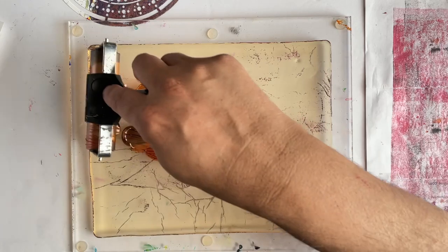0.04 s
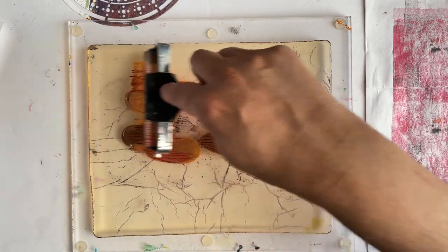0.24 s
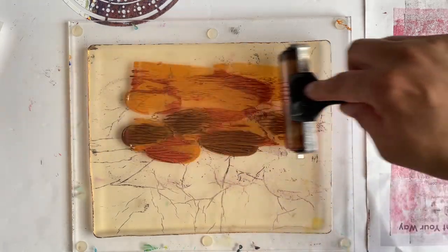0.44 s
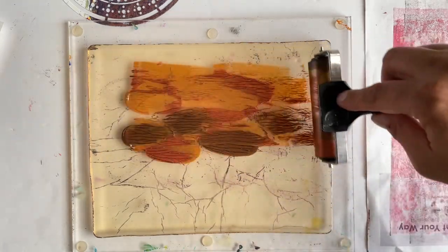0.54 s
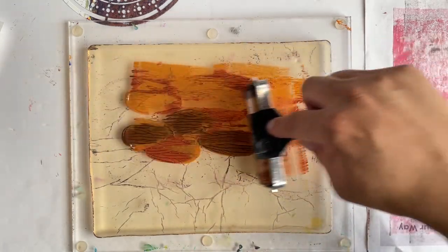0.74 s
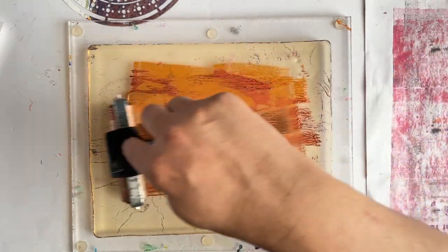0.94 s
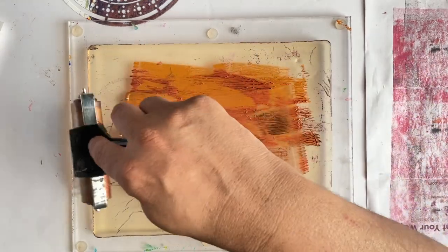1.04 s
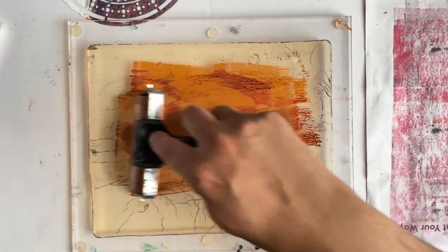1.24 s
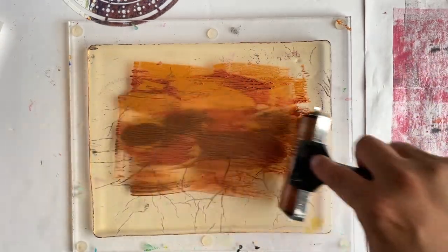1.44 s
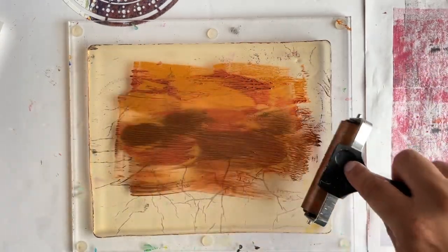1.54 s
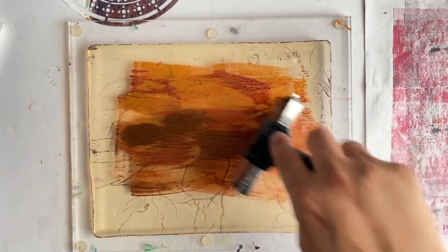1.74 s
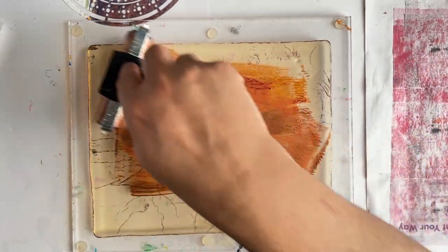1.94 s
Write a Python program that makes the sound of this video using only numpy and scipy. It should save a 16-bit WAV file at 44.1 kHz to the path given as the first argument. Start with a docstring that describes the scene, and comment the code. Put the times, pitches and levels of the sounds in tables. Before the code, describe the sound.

A hand roller is pushed quickly back and forth through tacky paint, its loose axle rattling in sharp metallic clack bursts at each turn, with soft sticky hiss between, close stereo microphone in a small quiet room.

```python
"""A faint low hum and a soft hiss come first, then the quick metallic chatter of a hand roller on a soft plate.
At each turn the loose axle knocks in its metal frame (ticks ringing tuned parts) and the table thuds (low tones
that die away). Between turns the roller hisses through tacky paint (coloured noise with crackle), with dull
scuffs (puffs of low noise). Rumble and hum lie underneath; left and right differ in phase, opposite near
9 to 11 kHz."""
import sys
import numpy as np
from scipy import signal
from scipy.fft import rfft, irfft
from scipy.io import wavfile
from scipy.ndimage import uniform_filter1d

SR = 44100
rng = np.random.default_rng(int(sys.argv[2]) if len(sys.argv) > 2 else 0)


def unload_audio(sound):
    """Save the sound as a 16-bit wav file, at the path given as the first command line argument."""
    columns = np.transpose(np.atleast_2d(sound))
    # keep every value between -1 and 1, then stretch to whole-number steps
    steps = np.round(np.clip(columns, -1, 1) * 32767)
    wavfile.write(sys.argv[1], SR, steps.astype(np.int16))


N = 88200  # samples: two seconds


def gain_of(db):
    """Turn decibels into an amplitude factor."""
    return 10 ** (np.asarray(db) / 20)


def evened(x):
    """Scale a sound to an average (RMS) level of 1."""
    return x / np.sqrt(np.mean(x ** 2) + 1e-20)


def read_at_pitch(points, hz):
    """Read a table between its points, along a logarithmic pitch scale."""
    point_hz, value = np.transpose(points)
    return np.interp(np.log(hz + 1), np.log(point_hz + 1), value)


def curve(points):
    """Draw straight lines through points in time, one value per sample."""
    seconds, value = np.transpose(points)
    return np.interp(np.arange(N) / SR, seconds, value)


def add(mix, start_s, sound):
    """Lay a sound into the mix, cutting off what runs past the end."""
    part = mix[..., round(start_s * SR):][..., :sound.shape[-1]]
    part += sound[..., :part.shape[-1]]


def through(x, taps):
    """Pass a sound through a filter and keep the scene's length."""
    return signal.oaconvolve(x, taps)[:N]


def colour(points, size=2048):
    """Build a filter with the given spectrum and energy 1 that responds only after its input."""
    hz = abs(np.fft.fftfreq(size, 1 / SR))
    log_gain = np.log(gain_of(read_at_pitch(points, hz)))
    phase = -signal.hilbert(log_gain).imag  # minimum phase puts the energy early
    taps = np.fft.ifft(np.exp(log_gain + 1j * phase)).real
    return taps / np.linalg.norm(taps)


def equalized(x, points):
    """Raise or lower each pitch of a sound by the decibels in a table."""
    hz = np.fft.rfftfreq(N, 1 / SR)
    return irfft(rfft(x) * gain_of(read_at_pitch(points, hz)), N)


def ring(modes):
    """Struck parts ring as a sum of fading sine tones, here with total energy 1."""
    t = np.arange(SR // 8) / SR
    taps = sum(gain_of(db - 60 * t / t60) * np.sin(2 * np.pi * hz * t) for hz, db, t60 in modes)
    return taps / np.linalg.norm(taps)


def ticks(shape, per_s, spread_db):
    """Random clicks, dense or sparse by their rate, of random sign and size."""
    size = gain_of(spread_db * np.minimum(rng.exponential(1, shape), 4))
    sign = rng.choice([-1., 1.], shape)
    happens = rng.random(shape) < per_s / SR
    return evened(size * sign * happens)


def turning_weight(k, turns_per_s):
    """One of three slow waves, a third of a turn apart, whose total power stays constant."""
    return np.sqrt(2 / 3) * np.cos(2 * np.pi * (turns_per_s * np.arange(N) / SR + k / 3))


# Knocks of the loose axle. Each row: start in seconds, relative level in dB, chatter fade time in seconds,
# body pitch in Hz, then extra level in dB for body, frame, bracket and axle.
AXLE_KNOCKS = [(0.1721, -52, 0.0027, 1490, -1, 6, 8.5, -2), (0.1806, -31, 0.0097, 1506, 17.5, -3.5, 16, 0),
               (0.1809, -33, 0.0033, 1200, -13, -30, -15, 14),
               (0.1896, -8.5, 0.0012, 1166, 13.5, -19, 15, 11.5),
               (0.1926, -6, 0.0019, 1270, -29, -18, -31, 2), (0.2024, -39, 0.0024, 1120, 18, -20, -22, -5),
               (0.317, -35.5, 0.0019, 1550, 10, -5, 11.5, -10),
               (0.4098, -45, 0.0043, 850, -7, -15, 10.5, 9), (0.4689, -26.5, 0.0031, 810, 1, -5, -1, -15),
               (0.4755, -9.5, 0.0036, 830, 5, -2, 8, 14), (0.4824, -17.5, 0.0027, 1105, 12, -10, 12.5, -20),
               (0.484, -2.5, 0.0023, 1520, -2.5, -13, -23, 10), (0.4896, -20, 0.0038, 1060, 4, -10, 1, -3),
               (0.4997, -27.5, 0.0033, 1640, -3, -4, 12, 13), (0.5133, -33, 0.0024, 1430, -2, -35, -7, 13),
               (0.555, -37, 0.0017, 1040, 16, 0, 19.5, -14), (0.6822, -43.5, 0.0038, 797, -14, -12, 24, -6),
               (0.687, -27, 0.0055, 950, 6.5, -11.5, -20, 0.5),
               (0.691, -10.5, 0.0048, 680, -3, -32, -27, -4),
               (0.6928, -11.5, 0.0025, 1600, -14.5, -4.5, 14.5, 3),
               (0.6952, -10.5, 0.0012, 2210, 2.5, -3, -27, 23.5),
               (0.9573, -43.5, 0.003, 1190, 14, -0.5, -1, -5),
               (0.9618, -30.5, 0.0033, 1310, 5.5, -6, 15, -21.5),
               (0.975, -16, 0.0011, 1460, 9.5, -9, 6, 15),
               (0.9773, -18, 0.003, 1096, -1, -18.5, -25.5, -21.5),
               (1.1716, -37, 0.0047, 1450, -1, -21, 18.5, -2.5),
               (1.1754, -25, 0.0032, 1510, 0.5, -9, -15, -5.5),
               (1.18, -5.5, 0.0061, 1760, 3, -21, -15.5, 8.5),
               (1.1823, -13, 0.0029, 1390, 10.5, -30, 16, 20.5),
               (1.1872, -7, 0.0018, 665, 0.5, -30, -21.5, 20),
               (1.1915, -36, 0.0025, 1600, -10, -25, -19, 5.5),
               (1.1993, -19, 0.0023, 1220, 5, -11, 8.5, -13), (1.436, -26, 0.0031, 1030, -5, -1, 4, 6),
               (1.457, -39, 0.0023, 755, 15, 2, 19, -2), (1.4642, -17, 0.0025, 790, 13, -1, 17.5, 20),
               (1.4702, -5, 0.004, 770, -5.5, -12.5, -38, 9.5),
               (1.4744, -17, 0.002, 1520, 12.5, -15, 15, 9), (1.4792, -17, 0.0031, 1155, 8, -46, -19, -2),
               (1.484, -45, 0.0015, 751, -7, -24, 20, -8), (1.5807, -41, 0.0025, 1150, 9.5, -7, 17.5, -23),
               (1.612, -47.5, 0.0075, 1700, -4, 5, 6, -20), (1.6247, -22.5, 0.0034, 1660, -27, -22, 2, 4),
               (1.6263, -33.5, 0.0034, 751, -13, -15, 13, -5),
               (1.6691, -37.5, 0.0053, 1320, 18, 6.5, 7, 12),
               (1.6734, -18.5, 0.0068, 1170, -4.5, -5.5, 0.5, 4),
               (1.6759, -21.5, 0.0042, 1610, 2.5, 4, 15.5, 9),
               (1.6816, -10, 0.0021, 1365, 4.5, -6.5, 12.5, 10),
               (1.6838, -0.5, 0.00092, 764, 1.5, -12, -34, 11), (1.6895, -21, 0.0029, 1140, 0, -29, -20, 2),
               (1.8603, -38.5, 0.0013, 1190, 24, 0, 7, -27), (1.888, -53.5, 0.0035, 910, 26, -9, -7, 24),
               (1.946, -39.5, 0.0032, 1470, 21, -3, -16, -11),
               (1.9578, -16, 0.0056, 1493, 9.5, -39, -34, 8),
               (1.9628, -17, 0.0027, 1290, 5.5, -25, 17.5, -9),
               (1.9654, -12, 0.0047, 1510, 6, -16, -24, -9), (1.9768, -27, 0.0036, 1270, 6, -10, -26, -10)]
# Tones of the metal frame, before a small pitch shift at each knock.
# Each row: pitch in Hz, relative level in dB, time to fall by 60 dB in seconds.
FRAME_TONES = [(2895, 3, 0.028), (3035, -2, 0.026)]
# Tones of the bracket, shifted likewise.
# Each row: pitch in Hz, relative level in dB, time to fall by 60 dB in seconds.
BRACKET_TONES = [(3500, -4, 0.018), (4690, -5, 0.022), (5460, 0, 0.015), (5850, -6, 0.014),
                 (6950, -5, 0.012), (7130, 1, 0.018)]
# Tones of the axle ends, shifted likewise.
# Each row: pitch in Hz, relative level in dB, time to fall by 60 dB in seconds.
AXLE_TONES = [(12780, 0, .018), (13130, -1, .018), (13360, 0, .018), (13680, -2, .015), (14230, -3, .012),
              (14700, -5, .01)]
# Tone colour of the dry crack. Each row: pitch in Hz, relative level in dB.
CRACK_COLOUR = [(500, -27.5), (800, -6), (1200, -6), (2300, 1), (3500, 11), (6000, 9.5), (9000, 11.5),
                (12000, 10), (15000, 2.5), (17000, -2)]
BODY_DB, FRAME_DB, BRACKET_DB, AXLE_DB, CRACK_DB = -15, 5.5, -10.5, -17.5, -5
TICKS_PER_S, TICK_SPREAD_DB = 16000, 2.5
KNOCK_RISE_S, KNOCK_LOW_HZ = 0.00071, 662
BODY_T60_S, BODY_UPPER_RATIO, BODY_UPPER_DB = 0.016, 1.427, -5.5  # weaker upper partner of the body tone
DETUNE = 0.005  # the loose parts sit a little differently at each knock (share of pitch)


def knocks():
    """Each knock is a dying flurry of ticks that cracks and rings body, frame, bracket and axle."""
    size = 2000  # samples per flurry
    t = np.arange(size) / SR
    crack, rings = np.zeros(N), np.zeros(N)
    shifts = 1 + DETUNE * rng.standard_normal((len(AXLE_KNOCKS), 3))
    flurries = ticks((len(AXLE_KNOCKS), size), TICKS_PER_S, TICK_SPREAD_DB)
    for (start_s, db, chatter_s, body_hz, *part_db), tick, shift in zip(AXLE_KNOCKS, flurries, shifts):
        shape = (1 - np.exp(-t / KNOCK_RISE_S)) * np.exp(-t / chatter_s)
        # the random ticks must not change the energy of the knock
        steady = np.linalg.norm(shape) / np.linalg.norm(tick * shape)
        flurry = gain_of(db) * tick * shape * steady / 2
        parts = [[(body_hz, 0, BODY_T60_S), (body_hz * BODY_UPPER_RATIO, BODY_UPPER_DB, BODY_T60_S)]]
        for modes, pitch_factor in zip([FRAME_TONES, BRACKET_TONES, AXLE_TONES], shift):
            parts.append(np.multiply(modes, [pitch_factor, 1, 1]))
        gains = gain_of(np.add([BODY_DB, FRAME_DB, BRACKET_DB, AXLE_DB], part_db))
        response = sum(gain * ring(modes) for gain, modes in zip(gains, parts))
        add(crack, start_s, gain_of(CRACK_DB) * flurry)
        add(rings, start_s, through(flurry, response))
    low_cut = signal.butter(8, KNOCK_LOW_HZ, "high", fs=SR, output="sos")
    return signal.sosfilt(low_cut, [through(crack, colour(CRACK_COLOUR)), rings])


SPREAD_FADE_S, SPREAD_TURNS_PER_S = 0.0015, 9


def knock_spread(hits):
    """Short random noise echoes, three in slow rotation, spread the hits between the sides."""
    t = np.arange(200) / SR
    out = np.zeros(N)
    for k in range(3):
        echo = rng.standard_normal(200) * np.exp(-t / SPREAD_FADE_S)
        out += through(hits * turning_weight(k, SPREAD_TURNS_PER_S), echo / np.linalg.norm(echo))
    return out


# Thuds of the table. Each row: start in seconds, relative level in dB, pitch in Hz,
# time to fall by 60 dB in seconds.
TABLE_THUDS = [(0.197, -27.5, 85, 0.061), (0.488, -43.5, 119, 0.048), (0.6985, -30, 86.3, 0.14),
               (1.202, -35.5, 105.5, 0.11), (1.541, -43, 113, 0.15), (1.695, -36.5, 102, 0.092),
               (1.871, -27.5, 185, 0.047), (1.9, -42, 165, 0.079), (1.938, -33, 199, 0.054),
               (1.944, -33, 118, 0.11), (1.973, -33, 116, 0.14), (1.981, -27, 221, 0.04)]
THUD_RISE_S = 0.0042


def thuds():
    """The pushed table top swings at a low pitch, rising softly and dying away."""
    t, out = np.arange(SR // 3) / SR, np.zeros(N)
    for start_s, db, hz, t60 in TABLE_THUDS:
        fade = gain_of(db - 60 * t / t60)
        rise = (1 - np.exp(-t / THUD_RISE_S)) ** 2
        add(out, start_s, fade * rise * np.sin(-2 * np.pi * hz * t) * 2)
    return out


# Loudness of the rolling. Each row: time in seconds, level in dB.
ROLLING_LEVEL = [(0, -64.5), (.1, -76), (.17, -79), (.25, -60.5), (.32, -56.5), (.45, -55.5), (.55, -55.5),
                 (.62, -68.5), (.67, -65.5), (.78, -60.5), (.9, -64.5), (1., -61), (1.08, -75.5),
                 (1.16, -76), (1.3, -66.5), (1.4, -61), (1.52, -53), (1.6, -57.5), (1.66, -58), (1.78, -57),
                 (1.85, -64.5), (1.865, -57.5), (1.93, -55), (2, -50)]
# Tone colour of the paint hiss. Each row: pitch in Hz, relative level in dB.
HISS_COLOUR = [(300, -15), (700, -1), (1500, 1), (3000, 2.5), (5500, -3.5), (8000, -2), (11000, -6.5),
               (15000, -8)]
TACK_PER_S, TACK_SPREAD_DB, TACK_DB = 600, 3.5, -7  # crackle of the tacky paint
CLUMP_DB, CLUMP_S = 1.8, 0.012  # hiss and crackle come in clumps
ROLL_RING_DB = -18


def rolling():
    """Paint threads snap under the roller: clumped hiss and crackle, and a little frame and bracket ring."""
    drive = rng.standard_normal(N) + gain_of(TACK_DB) * ticks(N, TACK_PER_S, TACK_SPREAD_DB)
    clumps = rng.standard_normal(N)
    for _ in range(2):
        clumps = uniform_filter1d(clumps, round(CLUMP_S * SR))
    drive = drive * gain_of(CLUMP_DB * evened(clumps))
    hiss = through(drive, colour(HISS_COLOUR))
    ringing = through(drive, ring(FRAME_TONES) + ring(BRACKET_TONES))
    return gain_of(curve(ROLLING_LEVEL)) * evened(hiss + gain_of(ROLL_RING_DB) * ringing)


# Dull scuffs of the roller on the plate. Each row: start in seconds, relative level in dB,
# middle pitch in Hz, length scale in seconds (loudest after a third of it).
ROLLER_SCUFFS = [(0.407, -62.5, 760, 0.012), (0.698, -50, 434, 0.0042), (0.715, -71.5, 270, 0.29),
                 (1.174, -52.5, 357, 0.03), (1.3, -75, 394, 0.13), (1.526, -53, 710, 0.017),
                 (1.53, -61, 407, 0.031), (1.543, -60.5, 700, 0.045), (1.673, -50.5, 454, 0.02),
                 (1.872, -64.5, 293, 0.05), (1.938, -47, 270, 0.03), (1.963, -51, 372, 0.04)]
SCUFF_WIDTH = 0.69  # the band reaches from pitch / 1.69 to pitch * 1.69


def scuffs():
    """Soft rubbing makes short puffs of low noise that swell and fade."""
    size = 8000  # samples per puff
    out = np.zeros(N)
    for start_s, db, hz, length_s in ROLLER_SCUFFS:
        edges = [hz / (1 + SCUFF_WIDTH), hz * (1 + SCUFF_WIDTH)]
        band = signal.butter(2, edges, "band", fs=SR, output="sos")
        noise = evened(signal.sosfilt(band, rng.standard_normal(size)))
        u = np.arange(size) / SR / length_s
        add(out, start_s, gain_of(db) * noise * 5 * u * np.exp(-3 * u) * np.e)
    return out


# How fast the room echo dies. Each row: pitch in Hz, time to fall by 60 dB in seconds.
ROOM_FADE = [(250, 0.36), (660, 0.38), (1740, 0.27), (4590, 0.24), (12100, 0.19)]
ROOM_START_S, ROOM_TURNS_PER_S = 0.0012, 1.3


def room(x):
    """Three random noise tails fade into one another, each pitch band dying at its own speed."""
    out = np.zeros(N)
    for k in range(3):
        hz, t, bands = signal.stft(rng.standard_normal(SR // 2), SR, nperseg=128)
        fade = gain_of(-60 * t / read_at_pitch(ROOM_FADE, hz)[:, None])
        tail = signal.istft(bands * fade, SR, nperseg=128)[1]
        tail = tail * np.clip(np.arange(len(tail)) / SR / ROOM_START_S, 0, 1)
        out += through(x * turning_weight(k, ROOM_TURNS_PER_S), tail / np.linalg.norm(tail))
    return out


# Tone colour of the low rumble. Each row: pitch in Hz, relative level in dB.
RUMBLE_COLOUR = [(20, -21), (40, -5), (60, 7.5), (100, -4), (160, -1.5), (225, -7.5), (260, -10),
                 (400, -16), (600, -31.5), (1200, -55)]
# Loudness of the rumble. Each row: time in seconds, level in dB.
RUMBLE_LOUDNESS = [(0, -64.5), (.35, -60.5), (.55, -61), (.66, -70.5), (.8, -61.5), (.95, -61.5),
                   (1.1, -70), (1.3, -57.5), (1.55, -60), (1.8, -57), (2, -50)]
# Tones of the hum, before waver and swell. Each row: pitch in Hz, level in dB.
HUM_TONES = [(107.7, -59.5), (161.5, -71.5), (215.3, -69)]
# Swell of the lowest hum tone. Each row: time in seconds, change in dB.
LOWEST_HUM_SWELL = [(0, -9), (.45, -8), (.6, -4.5), (.78, 1), (1., -1), (1.19, 3), (1.3, -7), (2, -14)]
HUM_WAVER_DB, HUM_WAVER_S = 1.5, 0.036


def background():
    """Low rumble is filtered noise; the hum is three wavering tones, the lowest of which swells."""
    t = np.arange(N) / SR
    rumble = evened(equalized(rng.standard_normal(N), RUMBLE_COLOUR))
    waver = rng.standard_normal((len(HUM_TONES), N))
    for _ in range(2):
        waver = uniform_filter1d(waver, round(HUM_WAVER_S * SR), axis=1)
    tones = [gain_of(db) * np.sqrt(2) * np.sin(2 * np.pi * (hz * t + rng.random())) for hz, db in HUM_TONES]
    hum = gain_of(HUM_WAVER_DB * evened(waver)) * tones
    hum[0] *= gain_of(curve(LOWEST_HUM_SWELL))
    return gain_of(curve(RUMBLE_LOUDNESS)) * rumble + hum.sum(axis=0)


# Scattered sound that differs between the sides. Each row: pitch in Hz, change in dB.
SIDE_SCATTER = [(150, -22.5), (300, -2.5), (700, 3), (1500, -10), (4000, -6), (7000, -18.5), (8300, -59.5)]
ROOM_DB, KNOCK_APART_DB = -6.5, -14.5
RING_IN_ROOM_DB = -9  # the ringing parts reach the room weaker than the crack


def scene():
    """Mix what both sides share, then add the scattered sound to the left and subtract it from the right."""
    crack, rings = knocks()
    hits = crack + rings
    into_room = gain_of(ROOM_DB) * (crack + gain_of(RING_IN_ROOM_DB) * rings)
    shared = hits + room(into_room) + thuds() + scuffs() + rolling() + background()
    # fresh random draws make the scattered sound differ from the shared one
    apart = equalized(room(into_room) + rolling() + background(), SIDE_SCATTER)
    apart = apart + gain_of(KNOCK_APART_DB) * knock_spread(hits)
    return np.array([shared + apart, shared - apart])


# Phase lead of left over right. Each row: pitch in Hz, phase lead in radians.
SIDE_PHASE = [(300, 0), (1700, .1), (3100, .65), (3800, .5), (4500, 1.2), (5200, 0.), (5900, .2),
              (7200, 1.4), (8000, 2.2), (8500, 2.9), (8800, np.pi), (11300, np.pi), (12000, 3.8),
              (12800, 4.6), (13500, 5.2), (14200, 5.9), (14800, 2 * np.pi)]
# Level balance of the sides. Each row: pitch in Hz, left minus right in dB.
SIDE_BALANCE = [(200, 0), (400, 0), (700, 2.5), (1300, 1), (2400, 1.4), (4400, .4), (8000, 0)]
EDGE_HZ, TOP_HZ, TOP_DB = 16750, 15850, -24


def record(dry):
    """Each pitch gets its own phase and level offset between the sides; the top treble is lowered, then cut."""
    size = N + 4096  # spare room so that shifted sound does not wrap round
    hz, side = np.fft.rfftfreq(size, 1 / SR), np.array([[1], [-1]])
    lead = np.exp(.5j * side * read_at_pitch(SIDE_PHASE, hz))
    balance = gain_of(side * read_at_pitch(SIDE_BALANCE, hz) / 2)
    shelf = gain_of(TOP_DB * np.clip((hz - TOP_HZ) / 500 + .5, 0, 1))  # slope 500 Hz wide
    out = irfft(rfft(dry, size) * lead * balance * shelf, size)[:, :N]
    band_limit = signal.firwin(511, EDGE_HZ, window=("kaiser", 9), fs=SR)
    return signal.oaconvolve(out, band_limit[None], "same")


dry = scene()
out = record(dry)
unload_audio(out)
```